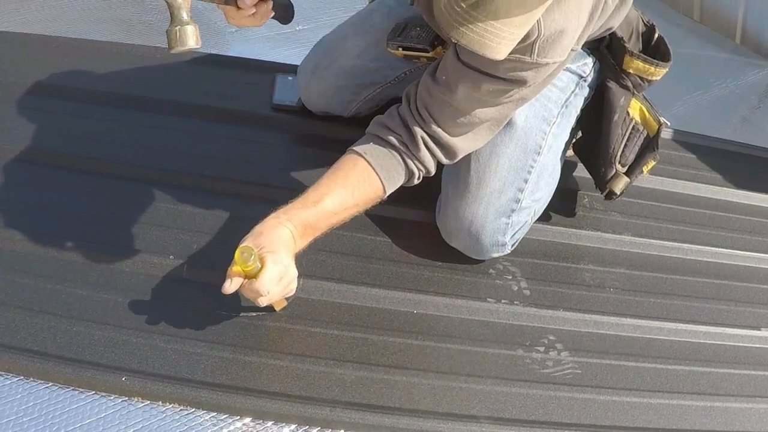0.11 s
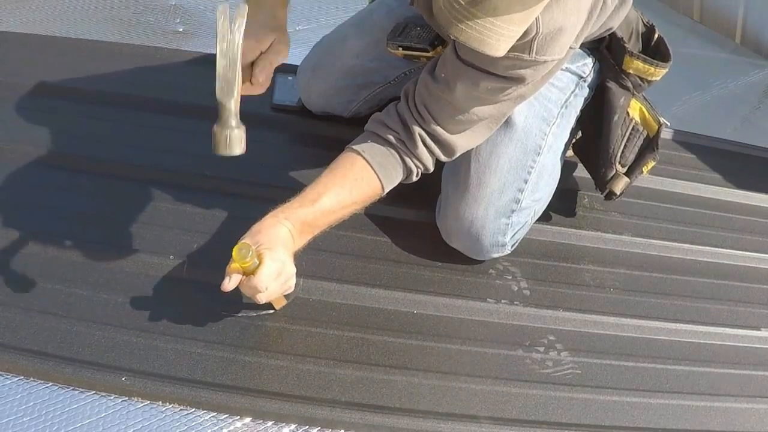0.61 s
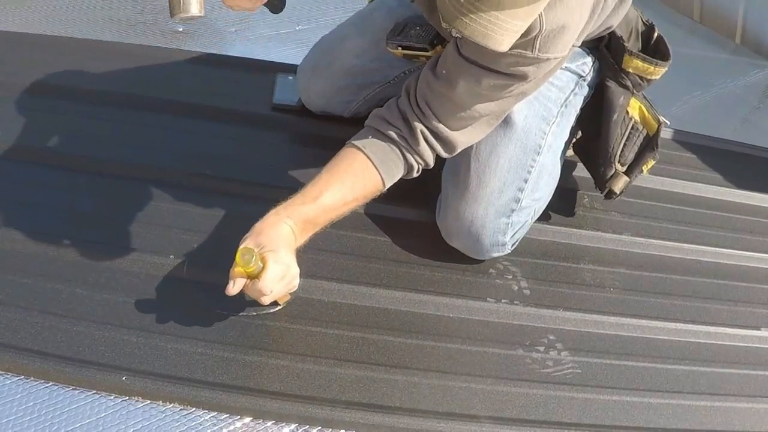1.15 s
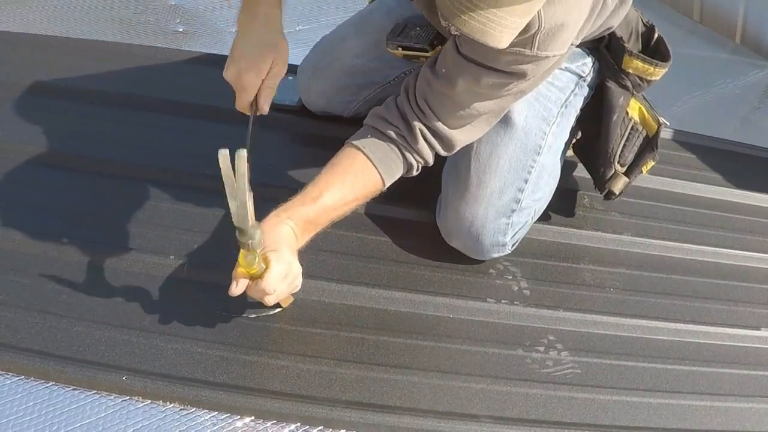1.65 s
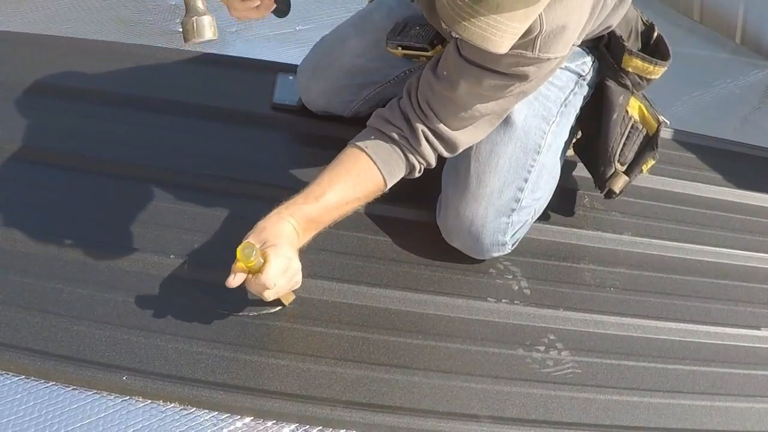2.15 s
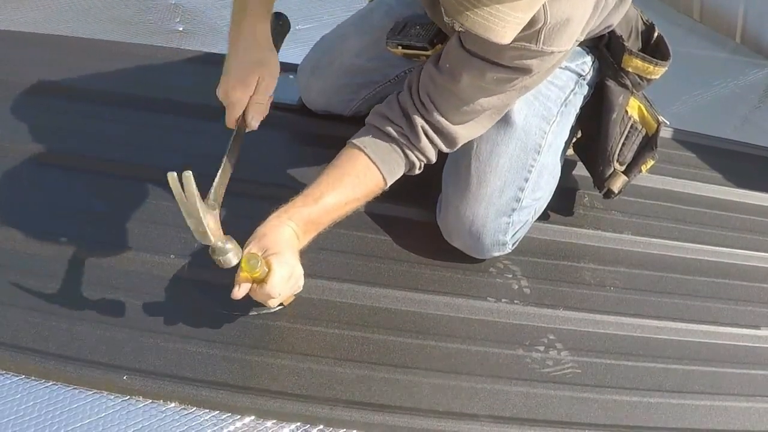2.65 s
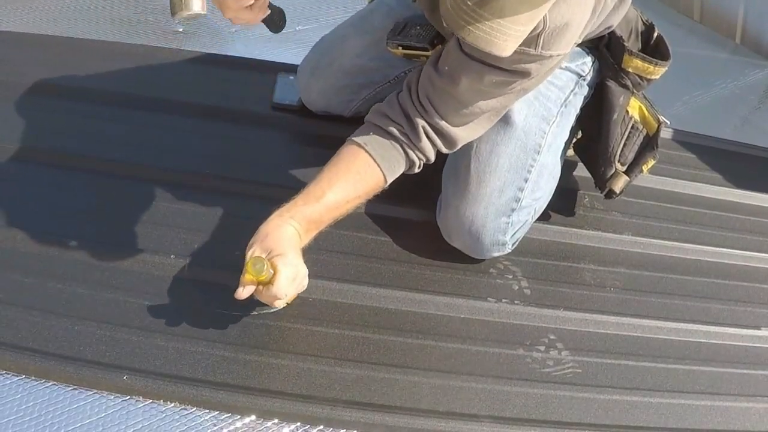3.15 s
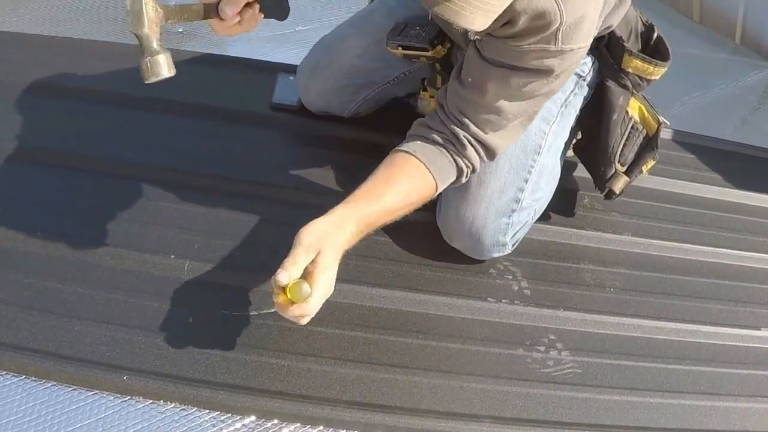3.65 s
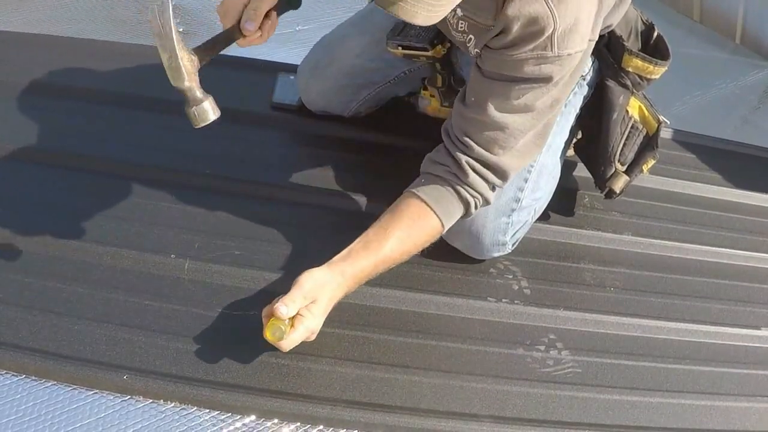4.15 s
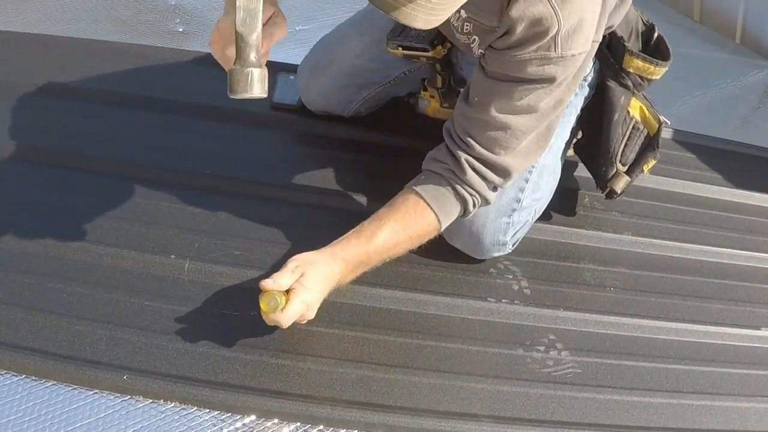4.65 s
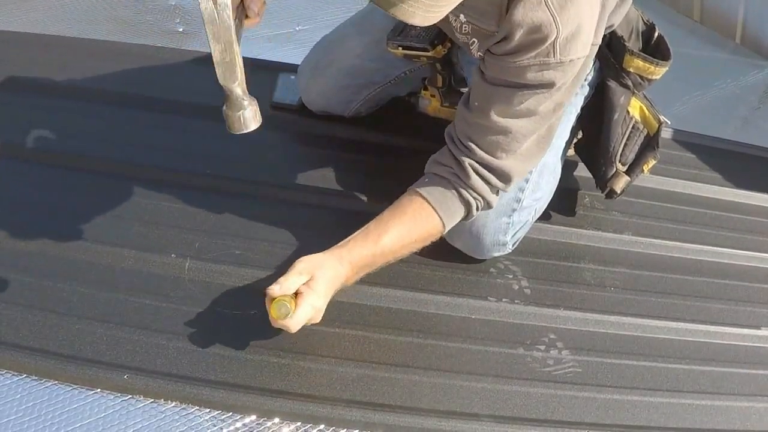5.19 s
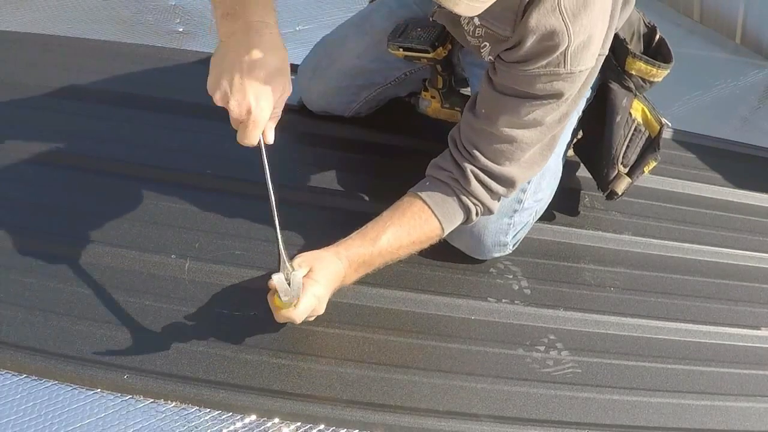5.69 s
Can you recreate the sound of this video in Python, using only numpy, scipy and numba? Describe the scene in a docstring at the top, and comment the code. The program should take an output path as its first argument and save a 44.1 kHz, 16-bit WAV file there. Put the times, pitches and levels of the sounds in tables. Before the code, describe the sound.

Close to a small microphone, steel hammer on chisel pounds a thin ribbed roof panel: sharp crack, quick downward-sliding twang, deep panel wobble and a swelling wash of ringing sheet metal. Four strong blows at roughly one-second spacing, then light taps, one duller and drier-sounding blow, and more taps. Gusty low wind and distant traffic lie underneath in open air, with no room echo.

```python
"""On a ribbed sheet-steel roof outdoors, a hammer drives a chisel into a panel a step from a small microphone.
Each blow clicks, sends a falling bending wave through the sheet, flexes it and swells into a dense ringing crash.
Light touches of the tools knock in between; wind on the microphone, a wavering hum, far traffic and hiss lie under.
Blows and touches are built from short modes and noise; their force also drives two thousand sheet resonators."""
import sys
import numpy as np
from numba import njit
from scipy import signal
from scipy.fft import rfft, irfft
from scipy.io import wavfile
from scipy.ndimage import uniform_filter1d, map_coordinates

SR = 44100
rng = np.random.default_rng(int(sys.argv[2]) if len(sys.argv) > 2 else 0)


def amplitude_ratio(level_db):
    """Convert a level in decibels to the matching linear amplitude (field) ratio."""
    exponent = np.asarray(level_db, float) / 20
    return 10 ** exponent


def generate_wav(signal):
    """Clip the signal to [-1, 1] and save it as 16-bit WAV at the path in sys.argv[1]."""
    frames = np.transpose(np.atleast_2d(signal))
    scaled = np.clip(frames, -1, 1) * 32767
    pcm = np.round(scaled).astype(np.int16)
    wavfile.write(sys.argv[1], SR, pcm)


N = 255780  # length in samples
LEAD = int(.25 * SR)  # samples ahead of the start, so that the first crash is already ringing

# hammer blows: start_s, bending_db, knock_hz, knock_db, crash_db
HAMMER_BLOWS = [(-.2, -4, 520, -9, -12.5), (0.7186, -3.5, 497, 0.5, -14.5), (1.7144, -7, 449, 3, -13.5),
                (2.676, -3.5, 524, -4.5, -16.5), (3.4339, -3, 481.5, 3, -20.5),
                (4.8246, -8.5, 1214, 4.5, -25.5)]
# light touches of chisel and hammer: start_s, knock_hz, knock_db, knock_t60_s, crash_db
LIGHT_TOUCHES = [(.335, 1550, -32, 0.056, -56), (1.316, 3600, -32, 0.012, -35.5),
                 (2.27, 432, -25.5, 0.44, -56), (2.353, 598, -28, 0.09, -39), (3.905, 4480, -62, 0.38, -59),
                 (4.238, 475, -15.5, 0.23, -31), (5.3044, 634, -12, 0.14, -32.5),
                 (5.580, 409, -7.5, 0.12, -28.5), (5.768, 3970, -35, 0.0091, -73)]
# colour of the sheet's dense mode field: pitch_hz, level_db
SHEET_COLOUR = [(90, -104), (200, -0.5), (330, 7.5), (680, 3.5), (1300, 6.5), (1900, 2), (2700, 5),
                (3900, -3.5), (5300, -2.5), (6200, -12.5), (7300, -25), (10000, -28.5), (11500, -51),
                (13200, -31), (15000, -55)]
# typical ring time of the sheet's modes: pitch_hz, t60_s
SHEET_RING = [(90, 0.79), (400, 0.67), (1200, 0.85), (2800, 0.71), (4200, 0.5), (5000, 0.49), (5400, 0.55),
              (5900, 0.58), (7500, 0.53), (15000, 0.89)]
# close modes of the hammer head: pitch_hz, level_db, t60_s
HEAD_MODES = [(5400, -21, 0.71), (5450, -2, 0.8), (5520, -5, 0.55), (5500, -5, 0.75)]
# slow flexing of the panel, against the bending wave: settled_pitch_hz, level_db, t60_s, swell_s
FLEX_MODES = [(26.73, -11, 0.76, 0.004), (51.8, -5.5, 0.24, 0.012), (120.8, -11, 0.68, 0.1),
              (229.8, -6, 0.14, 0.018), (131.4, -19.5, 0.48, 0.054)]
# steady outdoors, relative colour from far traffic up to microphone hiss: pitch_hz, density_db_per_hz
AIR_COLOUR = [(200, -28), (500, -0.5), (1000, -3.5), (2000, -11.5), (3500, -24.5), (6500, -31), (8500, -24),
              (11000, -30.5), (15000, -91)]
# swells of the hum, before its random wavering: middle_s, level_db, half_length_s
HUM_SWELLS = [(0.452, -46, 0.33), (1.503, -42, 0.27), (2.396, -38, 0.15), (3.363, -42, 0.22),
              (4.307, -33.5, 0.18)]
# gusts on the microphone, added as power to the calm: peak_s, rumble_db, rise_s, fall_s
WIND_GUSTS = [(.1, -45, 0.07, 0.065), (1.62, -35, 0.22, 0.27), (2.45, -31, .12, 0.57),
              (3.35, -36, 0.044, 0.3), (4.3, -30, 0.11, 0.34), (4.75, -28, 0.16, .2),
              (5.42, -33, 0.073, 0.15), (5.72, -27.5, 0.23, 0.067)]

AIR_DB, HUM_HZ = -53, 156.3
CALM_DB = -41.5  # rumble between gusts
FLUTTER_DB, FLUTTER_SHARE = -48.5, 0.72  # flutter in the calm; it follows this share of the gust's dB
# tilt of the crash: flat at this crash dB, then dB per octave for each dB above it
BLOW_FLAT_DB, BLOW_TILT = -21, 0.19  # harder blows crash brighter
TOUCH_FLAT_DB, TOUCH_TILT = -46, -0.4  # firmer touches press on the sheet and sound duller
SHAKE_DB, SHAKE_T60_S = -26, 1.3  # low rumble of the shaken roof, against the bending wave
CLICK_DB, HEAD_DB, HEAD_SHARE = -6.5, -47, 0.63  # the head rings with this share of the knock's dB
THUD_HZ, THUD_DB, THUD_T60_S = 244.6, -5, 0.18  # the chisel body, the same at every blow


def table(points, at):
    """Read (Hz, value) points on a log-frequency axis."""
    hz, value = np.transpose(points)
    return np.interp(np.log(np.maximum(at, 1)), np.log(hz), value)


def colour(x, points):
    """Filter by (Hz, dB) points."""
    hz = np.arange(x.shape[-1] // 2 + 1) * SR / x.shape[-1]
    return irfft(rfft(x) * amplitude_ratio(table(points, hz)), x.shape[-1])


def shaped(count, points):
    """Noise coloured by (Hz, dB) points, rms 1."""
    y = colour(rng.standard_normal(count), points)
    return y / np.std(y)


def tilt(db):
    """Points (Hz, dB) of a tilt by dB per octave from 125 Hz to 8 kHz, around 1 kHz."""
    return [(125, -3 * db), (8000, 3 * db)]


def walk(rate):
    """Random levels held 1 / rate s and slewed twice; spread near 1."""
    hold = int(SR / rate)
    steps = np.repeat(rng.standard_normal(N // 400), hold)[:N + hold]
    slewed = uniform_filter1d(uniform_filter1d(steps, hold), hold)
    return 1.445 * slewed[:N]


def swells(rows):
    """Bell-shaped swells (peak s, dB, rise s, fall s), summed as power."""
    t = np.arange(N) / SR
    power = np.zeros(N)
    for s, db, rise, fall in rows:
        power += amplitude_ratio(2 * db) * np.exp(-((t - s) / np.where(t < s, rise, fall)) ** 2)
    return power


def add(track, s, sound):
    """Mix a sound in at s seconds."""
    i = LEAD + int(s * SR)
    track[i:i + len(sound)] += sound[:len(track) - i]


def bending(db):
    """Bending waves run faster the higher they are, so the pitch drops; the panel then flexes slowly."""
    t = np.arange(SR) / SR
    start_hz, spread_s = 950, .005
    # the steep front carries most
    front = np.minimum(t / 0.001, 1) * (1000 ** (-t / 0.078) + 0.82 * 1000 ** (-t / 0.03))
    wave = front * np.sin(2 * np.pi * start_hz * spread_s * t / (t + spread_s))
    for k, (hz, mode_db, t60, swell_s) in enumerate(FLEX_MODES):
        swell = (-1) ** k * (1 - np.exp(-t / swell_s))  # the sense of the start alternates row by row
        # wide swings stiffen the sheet, so the pitch starts high
        turns = hz * (t + 0.01167 * (1 - np.exp(-t / 0.1)))
        wave = wave + amplitude_ratio(mode_db) * swell * np.sin(2 * np.pi * turns) * 1000 ** (-t / t60)
    return amplitude_ratio(db) * wave


def shake(db):
    """The roof under the panel shudders on as an uneven low rumble."""
    t = np.arange(SR) / SR
    rumble = shaped(len(t), [(8, -0.5), (25, 8), (55, 4.5), (120, -1), (250, -7), (600, -44.5)])
    return amplitude_ratio(db) * rumble * np.minimum(t / 0.0033, 1) * 1000 ** (-t / SHAKE_T60_S)


def knock(hz, db, t60, skirt_db):
    """The spot under the tool, damped by hand and knees: short modes round its pitch, skirt_db per octave."""
    t = np.arange(16384) / SR
    chance = rng.standard_normal((2, 30, 1))
    octaves = np.linspace(-1.2, 1.8, 30)[:, None] + .04 * chance[0]
    turns = 2 ** octaves * hz * t + 0.34 * chance[1]
    # the higher modes die sooner
    ring = amplitude_ratio(-skirt_db * np.abs(octaves)) * 1000 ** (-t * 2 ** (0.43 * octaves) / t60)
    cluster = np.sum(ring * np.sin(2 * np.pi * turns), axis=0) / 6
    return amplitude_ratio(db) * np.minimum(t / 0.00026, 1) * cluster


def click(db):
    """Steel face on steel cap: a bright millisecond."""
    t = np.arange(512) / SR
    burst = shaped(len(t), [(500, -33.0), (2000, -2), (4500, -1), (6500, -15.5), (8000, -63), (15000, -52)])
    return amplitude_ratio(db) * burst * np.minimum(t / 0.00034, 1) * np.exp(-t / 0.001)


def head_ring(db):
    """The hammer head sings on in a few close modes that beat against each other."""
    t = np.arange(SR) / SR
    ring = np.zeros(SR)
    for (hz, mode_db, t60), turn in zip(HEAD_MODES, rng.random(len(HEAD_MODES))):
        ring += amplitude_ratio(mode_db) * np.sin(2 * np.pi * (hz * t + turn)) * 1000 ** (-t / t60)
    return amplitude_ratio(db) * ring


def chatter(force_db, tilt_db, swell_s, first_db):
    """The force on the sheet: a first jolt, then the chisel edge chatters while waves spread over the ribs."""
    t = np.arange(16384) / SR
    force = shaped(len(t), tilt(tilt_db))
    shape = t / swell_s * np.exp(-t / swell_s) + amplitude_ratio(first_db) * np.exp(-t / 0.0072)
    return amplitude_ratio(force_db) * force * shape / np.sqrt(np.sum(shape ** 2))


@njit(fastmath=True)
def resonate(force, a1, a2, gain, spread):
    """A bank of two-pole resonators, heard as a centre sum and a sum weighted by spread."""
    out, y1, y2 = np.zeros((2, len(force))), np.zeros(len(a1)), np.zeros(len(a1))
    for i in range(len(force)):
        centre, wide = 0., 0.
        for k in range(len(a1)):
            y = a1[k] * y1[k] + a2[k] * y2[k] + gain[k] * force[i]
            y2[k] = y1[k]
            y1[k] = y
            centre += y
            wide += spread[k] * y
        out[0, i], out[1, i] = centre, wide
    return out


def sheet(force, count=2000):
    """Close modes of the sheet, each with its own ring time and random width; sparser above 7 kHz."""
    ring_chance, gain_chance, spread = rng.standard_normal((count, 3)).T
    slots = np.arange(count) / count
    shares, range_hz = [0, .8, 1], [90, 7000, 15000]
    hz = np.interp(slots + rng.random(count) / count, shares, range_hz)
    spacing = np.gradient(np.interp(slots, shares, range_hz))
    t60 = table(SHEET_RING, hz) * np.exp(0.11 * ring_chance)
    radius = 1000 ** (-1 / (t60 * SR))
    w = 2 * np.pi * hz / SR
    gain = np.sign(gain_chance) * amplitude_ratio(0.72 * np.abs(gain_chance)) * np.sqrt(spacing / 3000)
    # an inaudible offset keeps the silent resonators away from vanishingly small numbers
    ring = resonate(force + 1e-18, 2 * radius * np.cos(w), -radius * radius, gain * np.sin(w), spread)
    ring = colour(ring, SHEET_COLOUR)[:, LEAD:]
    # the flexing panel changes its tension, so every mode wavers in pitch
    at = np.arange(N) + 5.4 * walk(35)
    return [map_coordinates(part, [at], order=3, mode="nearest") for part in ring]


def blow(near, force, s, bend_db, hz, knock_db, crash_db):
    """A hammer blow sounds at the tool and panel (near) and drives the sheet (force)."""
    add(near, s, bending(bend_db))
    add(near, s, shake(bend_db + SHAKE_DB))
    add(near, s, knock(hz, knock_db, t60=0.12, skirt_db=21.5))
    add(near, s, click(CLICK_DB))
    add(near, s, knock(THUD_HZ, THUD_DB, THUD_T60_S, skirt_db=17))
    add(near, s, head_ring(HEAD_DB + HEAD_SHARE * knock_db))
    tilt_db = BLOW_TILT * (crash_db - BLOW_FLAT_DB)
    add(force, s, chatter(crash_db, tilt_db, swell_s=0.019, first_db=-15.5))


def wind():
    """Gusts buffet the microphone: a lumpy rumble and a lighter flutter above it."""
    rumble_db = 10 * np.log10(amplitude_ratio(2 * CALM_DB) + swells(WIND_GUSTS))
    flutter_db = FLUTTER_DB + FLUTTER_SHARE * (rumble_db - CALM_DB)
    gust = walk(7)
    rumble = shaped(N, [(8, -3.5), (22, 3.5), (55, -2.5), (90, -8), (200, -16.0), (600, -55.5)])
    flutter = shaped(N, [(50, -5), (120, -1), (250, -2.5), (450, -7), (900, -24.0), (3000, -59)])
    return rumble * amplitude_ratio(rumble_db + 2 * gust) + flutter * amplitude_ratio(flutter_db + gust + 1.2 * walk(23))


def air():
    """Far traffic and hiss as steady noise: nearly the same at both ports in the bass, apart in the hiss."""
    mid = shaped(N, [(60, -47.5)] + AIR_COLOUR)
    side = colour(shaped(N, [(60, -37)] + AIR_COLOUR), [(500, -34), (3000, -18.0), (7000, -3.5)])
    return amplitude_ratio(AIR_DB) * np.array([mid + side, mid - side])


def scuff(db, tilt_db, t60=0.26, swell_s=0.0085):
    """A light touch only stirs the sheet near the tool, which the hand soon stills."""
    t = np.arange(16384) / SR
    stir = colour(shaped(len(t), SHEET_COLOUR), tilt(tilt_db))
    return amplitude_ratio(db) * stir * (1 - np.exp(-t / swell_s)) * 1000 ** (-t / t60)


def touch(near, force, s, hz, knock_db, t60, crash_db):
    """A light touch knocks and scuffs at the tool (near) and faintly drives the sheet (force)."""
    tilt_db = TOUCH_TILT * (crash_db - TOUCH_FLAT_DB)
    add(near, s, knock(hz, knock_db, t60, skirt_db=8.5))
    add(near, s, scuff(crash_db, tilt_db))
    add(force, s, chatter(crash_db - 14.5, tilt_db, swell_s=0.0052, first_db=1))


def hum():
    """A narrow, wavering low tone that comes and goes."""
    turns = np.cumsum(HUM_HZ * (1 + 0.01912 * walk(3.0))) / SR
    size = np.sqrt(swells([(s, db, half, half) for s, db, half in HUM_SWELLS]))
    return np.sin(2 * np.pi * turns) * size * amplitude_ratio(3.3 * walk(3.62))


def tools():
    """All blows and touches; returns the centre and the part that differs between the ports."""
    near, force = np.zeros(LEAD + N), np.zeros(LEAD + N)
    for row in HAMMER_BLOWS:
        blow(near, force, *row)
    for row in LIGHT_TOUCHES:
        touch(near, force, *row)
    centre, wide = sheet(force)
    return near[LEAD:] + centre, wide


def scene():
    """Tools, wind and hum reach the left port one sample late; the sheet's width and the air go on top."""
    centre, wide = tools()
    centre = centre + wind() + hum()
    wide = amplitude_ratio(-7.0) * signal.lfilter([.5, -.5], [1], wide)  # ports differ more towards the treble
    left = np.r_[0, centre[:-1]] + wide
    right = centre - wide
    return np.array([left, right]) + air()


def roll_off(x):
    """The treble ends steeply here."""
    return signal.sosfilt(signal.butter(12, 15150, fs=SR, output="sos"), x)


def record(dry):
    """The input stage rounds the loudest peaks."""
    mix = np.tanh(1.122 * dry) / 1.029
    return roll_off(mix)


dry = scene()
out = record(dry)
generate_wav(out)
```